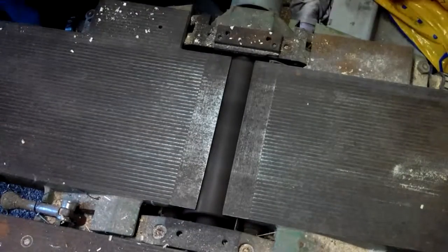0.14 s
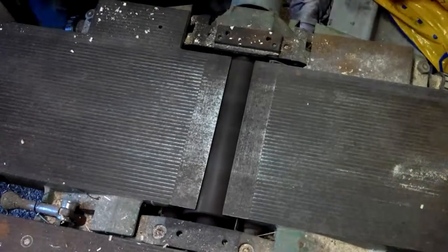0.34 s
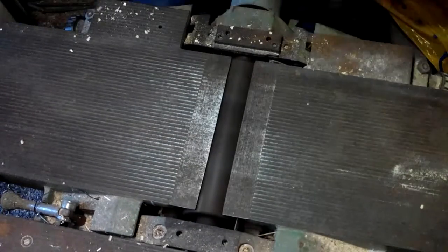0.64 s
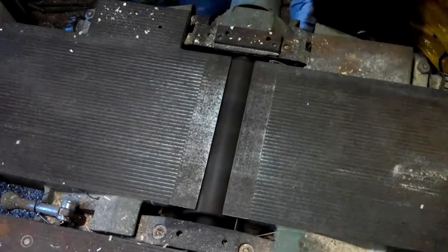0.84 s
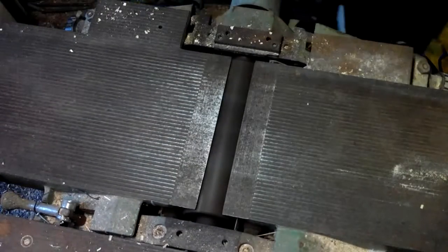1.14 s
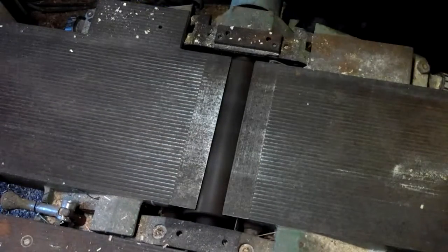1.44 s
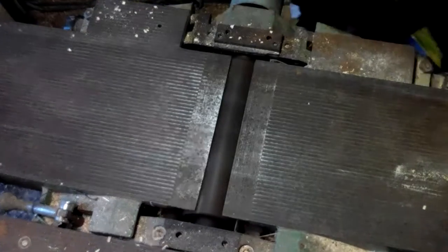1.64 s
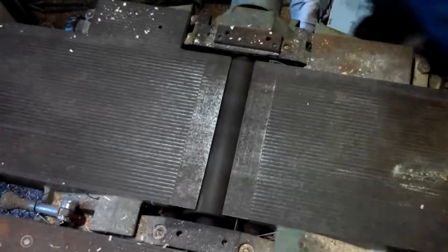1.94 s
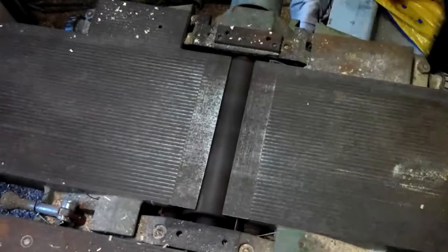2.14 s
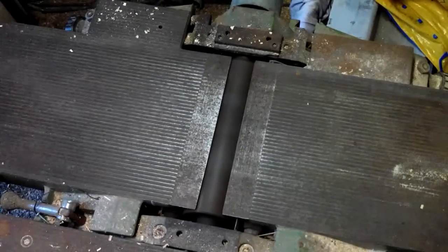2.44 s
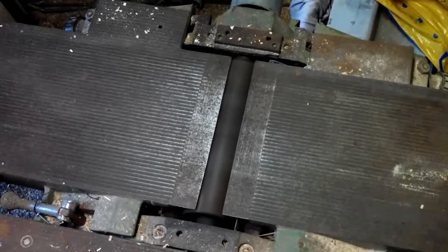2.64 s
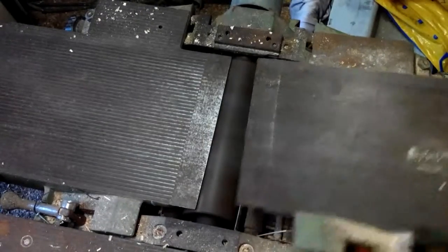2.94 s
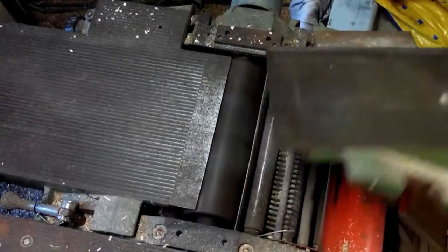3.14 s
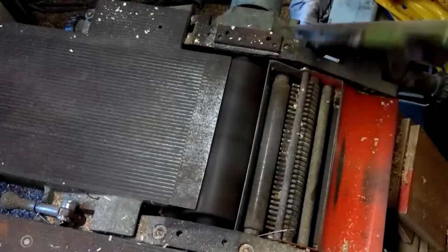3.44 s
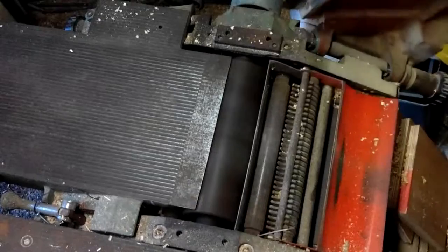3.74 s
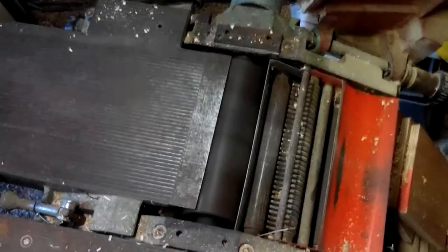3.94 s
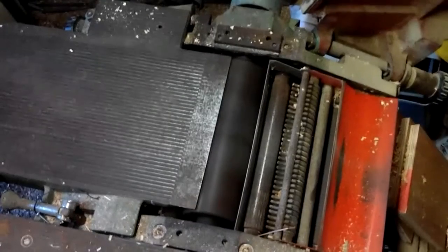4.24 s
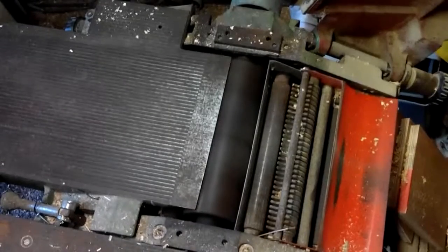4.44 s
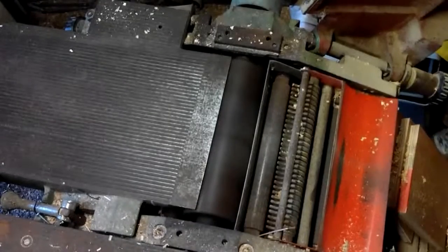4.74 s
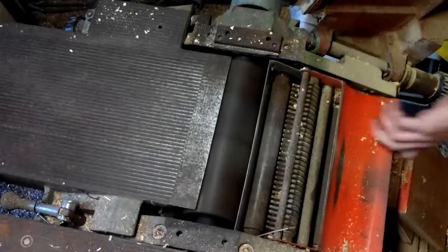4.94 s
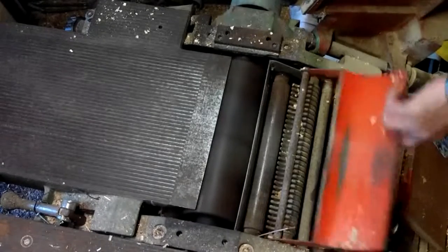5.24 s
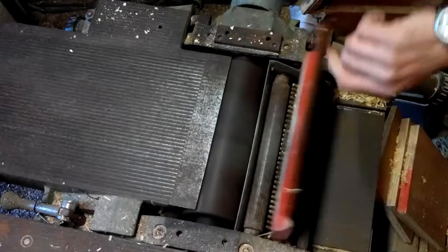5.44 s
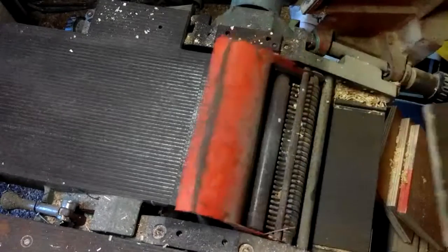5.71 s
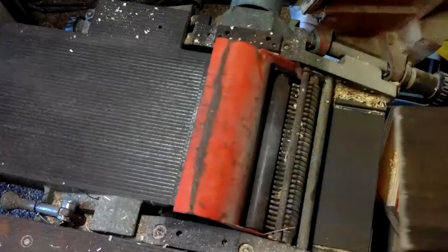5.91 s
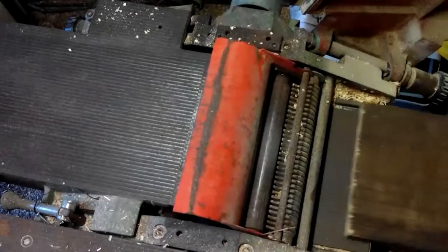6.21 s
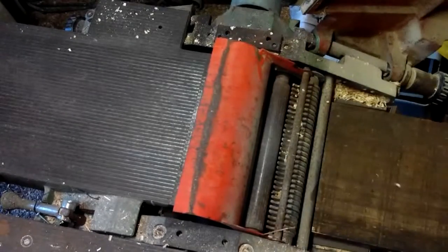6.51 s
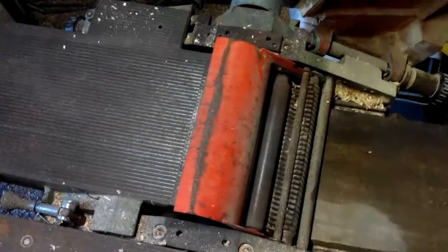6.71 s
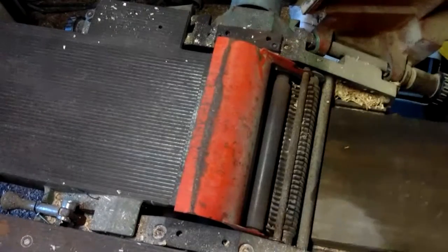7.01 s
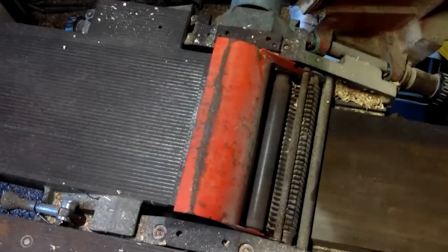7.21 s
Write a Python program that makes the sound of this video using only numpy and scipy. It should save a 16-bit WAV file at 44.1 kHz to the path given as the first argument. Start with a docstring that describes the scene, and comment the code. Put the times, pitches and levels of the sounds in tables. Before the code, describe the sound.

A woodworking planer runs steadily in a small workshop, close stereo microphones catching low siren hum, gear whine, belt throb and rushing air. The cast table comes loose with a dull clack and the tone turns brighter and more whistling. A sheet-metal hood slams with a loud rattling clang. A board bumps into place, then the knives bite with a harsh, ringing rasp to the end.

```python
"""A jointer-planer idles in a small workshop, heard by two microphones: three knives chop the air into a
siren hum, feed gears whine, a belt throbs and air rushes, all as wavering tones and shaped noise.
A table is swung open, the sheet-metal chip hood is flipped over and lands with a clang (ringing modes
in noise), and a board is pushed in until the knives bite: a rasp of one ringing blow per knife.
A limiter ducks the hum under the clang and the cut."""
import sys
import numpy as np
from scipy import signal
from scipy.fft import rfft, irfft, next_fast_len
from scipy.io import wavfile
from scipy.ndimage import uniform_filter1d, minimum_filter1d

SR = 44100
rng = np.random.default_rng(int(sys.argv[2]) if len(sys.argv) > 2 else 0)


def int16_out(signal):
    """Quantize to a 16-bit WAV file."""
    q = np.round(np.clip(np.atleast_2d(signal).T, -1, 1) * 32767)
    wavfile.write(sys.argv[1], SR, q.astype(np.int16))


N = 325006
TIME = np.arange(N) / SR  # s

HEAD_HZ, KNIVES = 83.985, 3  # cutterhead turns per second, knives on it
KNIFE_HZ = HEAD_HZ * KNIVES
FEED_HZ, BELT_HZ = 12.008, 8.455  # feed shaft turns and belt laps per second
CUT_S, BITE_S = 7.146, 0.016  # the knives meet the board; time to the first full bite


def amp(db):
    """Decibels to gain."""
    return 10 ** (np.asarray(db) / 20)


def unit(x):
    """Scales to rms 1."""
    return x / np.sqrt(np.mean(x ** 2) + 1e-20)


def ramp(start, length):
    """Rises from 0 to 1 over length seconds."""
    return np.clip((TIME - start) / length, 0, 1)


def swell(centre_s, length_s):
    """A bell-shaped rise and fall around one moment."""
    return np.exp(-((TIME - centre_s) / length_s) ** 2)


# Changes around the cutterhead, each with its start and length in seconds.
TABLE_OPENS, HOOD_CLOSES, BOARD_ENTERS = (2.93, 0.41), (5.6, 0.33), (6.703, 0.01)


def staged(levels):
    """A level through the stages: table shut, table open, hood on and, if given, board in."""
    moves = (TABLE_OPENS, HOOD_CLOSES, BOARD_ENTERS)
    return levels[0] + sum(step * ramp(*move) for step, move in zip(np.diff(levels), moves))


def curves(rows):
    """Each column of a time table at every sample."""
    s, *columns = np.transpose(rows)
    return [np.interp(TIME, s, c) for c in columns]


def at_hz(points, hz):
    """Reads a spectrum on a log-frequency axis."""
    f, value = np.transpose(points)
    return np.interp(np.log(hz + 1), np.log(f + 1), value)


def filtered(x, gain):
    """Filters a sound by a gain that is a function of frequency."""
    size = next_fast_len(x.shape[-1], True)
    hz = np.fft.rfftfreq(size, 1 / SR)
    return irfft(rfft(x, size) * gain(hz), size)[..., :x.shape[-1]]


def colour(x, points):
    """Filters a sound by a spectrum in dB."""
    return filtered(x, lambda hz: amp(at_hz(points, hz)))


def resonate(x, hz, width_hz):
    """A resonance of gain 1 at its centre."""
    return signal.lfilter(*signal.iirpeak(hz, hz / width_hz, fs=SR), x)


def wander(rate):
    """Slow chance of rms 1, with about rate turns a second."""
    coarse = TIME[::128]
    f = np.fft.rfftfreq(len(coarse), 128 / SR)
    spectrum = rfft(rng.standard_normal(len(coarse))) / np.sqrt(1 + (f / rate) ** 4)
    return np.interp(TIME, coarse, unit(irfft(spectrum, len(coarse))))


# How alike the left and right microphones hear the shop.
# Each row: frequency in Hz, likeness from -1 to 1.
LIKENESS = [(30, .45), (70, .975), (120, .987), (250, .988), (500, .97), (1000, .86), (2000, .81),
            (3200, .5), (4500, -.05), (6000, -.4), (9000, -.5)]


def likeness(hz):
    """How alike the two microphones hear a frequency; never quite the same."""
    return np.clip(at_hz(LIKENESS, hz), -1, .99)


def noise_pair(size):
    """White noise at two microphones, alike in the bass and unlike in the treble."""
    def shares(hz):
        return np.sqrt([(1 + likeness(hz)) / 2, (1 - likeness(hz)) / 2])

    mid, side = filtered(rng.standard_normal((2, size)), shares)
    return np.array([mid + side, mid - side])


def tone(turns, hz, db, flutter, flutter_hz, offset=0):
    """One wavering machine line; the higher it is, the more its phase differs between the microphones."""
    wavering = 1 + flutter * (wander(flutter_hz) + 1j * wander(flutter_hz))
    line = amp(db) * np.exp(2j * np.pi * (turns + offset)) * wavering
    lead = np.exp(.5j * np.arccos(likeness(hz)))
    return np.sqrt(2) * np.array([(line * lead).real, (line / lead).real])


# Rush of air and bearings with the table shut and open, before the stage offsets below.
# Each row: frequency in Hz, level in dB per Hz.
RUSH_SHUT = [(30, -84.5), (60, -82), (90, -73), (130, -63), (190, -60.5), (290, -64), (460, -63.5),
             (800, -73), (1300, -77), (2000, -75.5), (3200, -76.5), (5100, -80.5), (5500, -79), (5800, -83),
             (6700, -90), (7600, -102), (9000, -122)]
RUSH_OPEN = [(30, -90), (60, -81), (90, -65.5), (130, -66.5), (190, -67), (290, -62.5), (460, -63.5),
             (800, -70.5), (1150, -72.5), (1350, -75), (1650, -72.5), (3200, -75), (4600, -76), (5150, -82),
             (5500, -75), (5800, -81), (6700, -87), (7600, -101), (9000, -118)]
# Offsets in dB with table shut, table open, hood on, board in; the board steadies the rollers
# and blocks the air.
SHAKE_DB, AIR_DB = (-4, -2.4, 0.4, -8), (-1, -0.9, -0.2, -7)


def rush(clock, pulsing=0.047, patchy_db=1.18, rumble_hz=600):
    """Turbulence, pulsed as the knives pass the two table lips, over the rumble of the frame."""
    opened = ramp(*TABLE_OPENS)
    white = noise_pair(N) * np.sqrt(SR / 2)  # 0 dB per Hz
    both = (1 - opened) * colour(white, RUSH_SHUT) + opened * colour(white, RUSH_OPEN)
    rumble = filtered(both, lambda hz: 1 / (1 + (hz / rumble_hz) ** 4))
    puffs = 1 + pulsing * np.cos(2 * np.pi * 2 * KNIFE_HZ * clock)  # two lips: twice the knife rate
    air = (both - rumble) * puffs * amp(staged(AIR_DB) + patchy_db * wander(22))
    return rumble * amp(staged(SHAKE_DB)) + air


# Dull rumbles as the table is heaved and the board slides along the bed.
# Each row: moment of the crest in seconds, level in dB, length in seconds, centre in Hz.
RUMBLES = [(2.883, -37, 0.12, 185), (4.163, -52.5, 0.097, 76), (6.326, -32, 0.0087, 134),
           (6.372, -35, 0.11, 240), (6.437, -27, 0.011, 135), (6.44, -36, 0.05, 545),
           (6.715, -45, .012, 79)]


def rumbles(sharpness=3):
    """Heavy parts dragged over the frame: short swells of low noise."""
    white, out = noise_pair(N), np.zeros((2, N))
    for s, db, length, centre in RUMBLES:
        band = filtered(white, lambda hz: 1 / (1 + (sharpness * np.log((hz + 1) / centre)) ** 4))
        out += amp(db) * unit(band) * swell(s, length)
    return out


def knocks(blows, ring, spectrum, crack_t60, tail_t60, tail_db, tick_db,
           tick_t60=0.0091, focus_db=7, focus_width=.3):
    """Blows on metal: a sharp tick, a short crack, a few modes and a dense tail; each favours one range."""
    t = np.arange(SR // 3) / SR
    out = np.zeros((2, N + len(t)))
    tick = amp(tick_db - 60 * t / tick_t60)
    crack = amp(-60 * t / crack_t60)
    tail = amp(tail_db - 60 * t / tail_t60)
    attack = 1 - np.exp(-t / 0.00056)
    for s, db, ringing, centre in blows:
        def favour(hz):  # the spot struck
            nearness = np.exp(-(np.log((hz + 1) / centre) / focus_width) ** 2)
            return amp(focus_db * (nearness - 1))

        dense = unit(filtered(colour(noise_pair(len(t)), spectrum), favour)) * (tick + crack + tail)
        modes = np.zeros((2, len(t)))
        for hz, level, t60 in ring:
            # the microphones hear each mode up to a third of a turn apart
            turns = hz * t + rng.random() + rng.random((2, 1)) / 3
            modes += favour(hz) * amp(level - 60 * t / t60) * np.sin(2 * np.pi * turns)
        start = round(s * SR)
        out[:, start:start + len(t)] += amp(db) * (dense + ringing * modes) * attack
    return out[:, :N]


# The cast table unlatches. Each row: start in seconds, level in dB, share of ringing modes,
# favoured frequency in Hz.
LATCH = [(2.992, -28.5, 0.8, 3400), (3.000, -36, 1.5, 1350), (3.106, -35, .3, 3000)]
# Ring of the cast table. Each row: frequency in Hz, level in dB, fall by 60 dB in seconds.
IRON = [(1325, -2, 0.11), (2950, -5, 0.093), (3500, -3, 0.069), (4530, -14, 0.049)]
# Its dull clack. Each row: frequency in Hz, level in dB.
CLACK = [(300, -12), (1400, -3), (3400, -2), (5000, -1), (6500, -19), (9000, -54)]


def table_latch():
    """The heavy cast table comes loose: a dull clack with a few quickly damped modes."""
    return knocks(LATCH, IRON, CLACK, crack_t60=0.029, tail_t60=0.22, tail_db=-21, tick_db=3)


# The hood is gripped, lands and rattles. Each row: start in seconds, level in dB,
# share of ringing modes, favoured frequency in Hz.
HOOD_BLOWS = [(5.255, -40.5, 0.94, 4300), (5.872, -10.5, 1.2, 4600), (5.877, -17, 0.93, 1603),
              (5.885, -19, 0.31, 1750), (5.905, -22, .3, 3400), (5.924, -24, .35, 2980),
              (5.938, -27, .3, 3500), (5.949, -26, 0.27, 2300), (5.961, -27, .3, 3000),
              (5.976, -29, .3, 3340), (5.992, -18.5, 0.24, 4100), (5.999, -25, .3, 3160),
              (6.066, -29.5, 0.27, 4600), (6.075, -40, .25, 3800), (6.797, -48.5, 1.1, 4300)]
# Ring of the sheet metal. Each row: frequency in Hz, level in dB, fall by 60 dB in seconds.
SHEET = [(1610, 1, 0.12), (2040, -11.5, 0.097), (3040, -1.5, 0.09), (3210, -3, 0.086), (3650, -12, 0.22),
         (4190, -3, 0.081), (4450, 5.5, 0.053), (4680, 1, .055), (5130, -10.5, 0.29), (5370, -13.5, 0.26),
         (6030, -15, 0.16)]
# Its dense clatter. Each row: frequency in Hz, level in dB.
CLATTER = [(200, -18), (800, -7.5), (1350, 2.5), (2200, -4), (3200, -1.5), (5200, -0.5), (6700, -2.5),
           (8000, -17), (9500, -16), (11000, -31)]


def hood_clang():
    """Thin sheet metal is struck: ringing modes in a bright, dense clatter."""
    return knocks(HOOD_BLOWS, SHEET, CLATTER, crack_t60=0.058, tail_t60=0.23, tail_db=-10, tick_db=-7.0)


# Feed drive, meshes of 18 and 25 teeth with sidebands. Each row: multiple of the shaft speed
# (rounded when played), then level in dB with table shut, table open, hood on.
GEARS = [(14, -52.5, -50, -53.5), (23, -53.5, -47.5, -46), (24, -49.5, -46.5, -44), (25, -37, -35.5, -35.5),
         (27, -52, -48.5, -59.5), (32, -54.5, -50.5, -53), (35, -44, -46.5, -45), (36, -36.5, -46.5, -45),
         (43, -57, -54.5, -53.5), (50, -45.5, -52, -45.5), (54, -41.5, -42.5, -41.5),
         (71.6, -56.5, -46.5, -49.5), (74.6, -60.5, -55, -56.5), (89.9, -58, -54.5, -50),
         (96.3, -59.5, -53, -50), (107.6, -58.5, -54, -55), (161.2, -56.5, -52, -51.5),
         (180.8, -57, -56, -57)]
# Two meshes throb evenly. Each row: multiple of the shaft speed, throbs per second,
# time of a crest in seconds, depth from 0 to 1.
THROBS = [(36, 4.6, 0.051, 0.5), (54, 1.748, .29, 0.4)]
# Drive belt. Each row: multiple of its lap rate (rounded to a half when played),
# level in dB before the shaking of the frame.
BELT = [(11, -56.5), (12, -43.5), (13, -49), (14, -54), (15, -42), (16, -62), (17, -51), (33.5, -51.5),
        (37.5, -45)]
# Offset of the gear whine in dB with table shut, table open, hood on, board in.
WHINE_DB = (0.17, 0.2, -0.5, -2.5)


def drive(clock, belt_db=1):
    """Gear meshes whine and throb; the belt shakes the frame, which smears its bump over the whole lap."""
    whine_db, shake_db = staged(WHINE_DB), staged(SHAKE_DB)
    throb = {}
    for k, rate, crest, depth in THROBS:
        throb[round(k)] = abs(1 + depth * np.exp(2j * np.pi * rate * (clock - crest)))
    out = np.zeros((2, N))
    for k, *levels in GEARS:
        hz, db = round(k) * FEED_HZ, whine_db + staged(levels)
        mesh = tone(hz * clock, hz, db, flutter=.09, flutter_hz=2.1, offset=rng.random())
        out += throb.get(round(k), 1) * mesh
    for k, db in BELT:
        multiple = round(2 * k) / 2
        hz = multiple * BELT_HZ
        smear = multiple ** 2 / 14  # turns of phase
        shaken_db = db + 0.94 * shake_db + belt_db
        out += tone(hz * clock, hz, shaken_db, flutter=0.39, flutter_hz=1.2, offset=smear)
    return out


# One knife stands proud and takes most of the cut: depth of bite from 0 to 1 for each knife.
BITES = [1, 0.28, 0.29]
# Crack of each chip. Each row: frequency in Hz, level in dB.
CHIP = [(100, -20), (420, -5), (600, -15), (1100, -15), (1500, -6), (1950, -6), (2250, -7.5), (2700, -1.5),
        (3400, -2.5), (4000, -5.5), (4600, -7.5), (5300, -2), (6400, -14), (7100, -18), (8000, -31),
        (11000, -29)]
# Resonances of board and chips scream in turn as the cut deepens. Each row: time of the crest
# in seconds, length in seconds, frequency in Hz, width in Hz, level in dB against the chips.
SCREAMS = [(7.172, 0.023, 4250, 250, 3), (7.21, .05, 3440, 282, 0), (7.28, 0.051, 2680, 330, 4.5),
           (7.295, .03, 1640, 400, 3), (7.32, .05, 5100, 450, -2), (7.342, 0.027, 4260, 500, -5)]
# Drumming of the board, in step with the knives. Each row: multiple of the cutterhead speed,
# level in dB before the overall drumming level.
BOARD = [(6, -13.5), (9, -11), (12, -33), (15, -17), (18, -22), (23, -19.5)]
CUT_DB, DEEPEN_DB_PER_S, FULL_S = -28.5, 25, 0.21  # chips at the start; growth; seconds to full depth
DRUM_RISE_S, DRUM_DB = 0.062, -16  # the board is slower to start drumming
TEAR, UNEVEN = .25, .09  # share of torn-fibre noise; spread in strength from chip to chip


def cut(clock, ring_t60=0.065, room_db=-22, room_t60=0.14, tear_s=0.00084, count=5):
    """Every knife tears off a chip; one bites deepest, so the buzz repeats once a turn of the head."""
    passes = np.floor(KNIFE_HZ * clock).astype(int)
    blows = np.diff(passes, prepend=0) * np.array(BITES)[passes % KNIVES]
    blows = blows * (1 + UNEVEN * rng.standard_normal(N))
    t = np.arange(SR // 5) / SR
    decay = amp(-60 * t / ring_t60) + amp(room_db - 60 * t / room_t60)
    # as the board advances, each spot that is struck rings in its own way, evenly over all frequencies
    advance = np.interp(TIME, [CUT_S, TIME[-1]], [0, count - 1])
    ringing = np.zeros((2, N))
    for spot in range(count):
        share = np.cos(np.pi / 2 * np.minimum(abs(advance - spot), 1))
        response = rfft(noise_pair(len(t)) * decay)
        flat_ring = irfft(response / abs(response))[:, :len(t) // 2]
        ringing += signal.oaconvolve((blows * share)[None], flat_ring, axes=1)[:, :N]
    tearing = noise_pair(N) * signal.lfilter([1], [1, -np.exp(-1 / (tear_s * SR))], blows)
    chips = unit(colour(unit(ringing) + TEAR * unit(tearing), CHIP))

    screams = np.zeros((2, N))
    for s, length, hz, width, db in SCREAMS:
        screams += amp(db) * swell(s, length) * resonate(chips, hz, width)

    board = np.zeros((2, N))
    for k, db in BOARD:  # each bite pushes, then pulls
        hz = k * HEAD_HZ
        board -= tone(hz * clock, hz, db, flutter=0.1, flutter_hz=14, offset=1 / 4)

    depth_db = CUT_DB + DEEPEN_DB_PER_S * np.minimum(TIME - CUT_S, FULL_S)
    depth = ramp(CUT_S, BITE_S) * amp(depth_db)
    return depth * (chips + screams) + amp(DRUM_DB) * ramp(CUT_S, DRUM_RISE_S) * board


# Strongest harmonics of the siren. Each row: multiple of the knife rate, level in dB with
# table shut, table open, hood on, board in, then slow sway in dB.
HUM = [(1, -20.5, -26.5, -26, -23.5, 0.7), (2, -28.5, -25.7, -25.5, -26.5, 0.2),
       (3, -36, -34, -33, -33.5, 0.64)]
# Weaker harmonics. Each row: multiple of the knife rate, level in dB with table shut,
# table open, hood on, board in.
OVERTONES = [(4, -55.5, -50.5, -43.5, -48.5), (5, -57, -54, -45, -45), (7, -56, -42, -46, -45),
             (8, -44, -44.5, -51.5, -46), (9, -53, -43, -50, -58), (10, -58, -51, -58.5, -47.5),
             (11, -53, -50, -56.5, -60), (12, -56, -50.5, -51, -58), (13, -48, -45, -46.5, -45.5),
             (14, -58.5, -53.5, -63, -60), (15, -58, -61, -64.5, -82), (16, -58.5, -55, -58, -63),
             (20, -67, -61.5, -63, -61), (24, -64.5, -59, -61, -67.5)]
# With the table shut the hum drifts toward its second harmonic.
# Each row: multiple of the knife rate, drift in dB per second.
DRIFT = [(1, -0.65), (2, 1)]
# The sixth harmonic whistles, swelling while the cutterhead lies open. # Each row: time in seconds, level in dB
# before the siren sinks under the cut.
WHISTLE = [(0.1, -49.5), (0.37, -44), (0.6, -45), (0.8, -51), (0.95, -44.5), (1.3, -43.5), (1.47, -52.5),
           (1.65, -47.5), (2.2, -46.5), (2.35, -45.5), (2.7, -43.5), (2.86, -45), (3.25, -36), (3.62, -34),
           (4.0, -37.5), (4.5, -34.5), (4.85, -38), (5.27, -34.5), (5.48, -44), (5.7, -36.5), (5.8, -44),
           (6.1, -41), (6.65, -44.5), (6.84, -38.5), (7.05, -44.5), (7.13, -36), (7.2, -43)]
WHISTLE_ORDER, WHISTLE_FLUTTER = 6, .07
SIREN_SINK_DB = -5.5  # the siren sinks once the knives bite


def knife_hum(clock, sway_hz=1.3, overtone_sway_db=1.35):
    """Each knife passing the table lip sucks a pulse of air: a siren, its upper harmonics fluttering."""
    shut = 1 - ramp(*TABLE_OPENS)
    drift = {k: db_per_s * (TIME - TABLE_OPENS[0] / 2) * shut for k, db_per_s in DRIFT}
    whistle_hz = WHISTLE_ORDER * KNIFE_HZ
    (whistle_db,) = curves(WHISTLE)
    out = tone(whistle_hz * clock, whistle_hz, whistle_db, flutter=WHISTLE_FLUTTER, flutter_hz=17)
    for k, *levels, sway_db in HUM:
        hz = k * KNIFE_HZ
        db = staged(levels) + drift.get(k, 0) + sway_db * wander(sway_hz)
        out -= tone(hz * clock, hz, db, flutter=0.021 * k, flutter_hz=7.2)
    for k, *levels in OVERTONES:
        hz = k * KNIFE_HZ
        db = staged(levels) + overtone_sway_db * wander(sway_hz)
        out += tone(hz * clock, hz, db, flutter=0.09, flutter_hz=15.0, offset=rng.random())
    return out * amp(SIREN_SINK_DB * ramp(CUT_S, BITE_S))


# The level dips briefly, twice. Each row: time of the lowest point in seconds, depth in dB,
# length in seconds.
DIPS = [(6.711, -7.5, 0.012), (7.187, -5.5, 0.024)]


def dips():
    """Gain that sinks for a moment and comes back."""
    return amp(sum(db * swell(s, length) for s, db, length in DIPS))


# Balance of the two microphones. Each row: frequency in Hz, left minus right in dB.
BALANCE_DB = [(60, 2.5), (250, -1), (500, 0.7), (1000, 3), (2000, 2.5), (4000, 1.5), (6000, 1), (9000, 2)]


def scene():
    """All running parts share one clock whose speed drifts very slightly."""
    clock = TIME + np.cumsum(.0003 * wander(1.94)) / SR
    running = rush(clock) + drive(clock) + cut(clock) + knife_hum(clock)
    handled = rumbles() + table_latch() + hood_clang()
    halves = np.array([[.5], [-.5]])  # left, right
    heard = filtered(running + handled, lambda hz: amp(halves * at_hz(BALANCE_DB, hz)))
    return heard * dips()


CEILING_DB, EDGE_HZ = -10.8, 11250  # limiter threshold; upper edge of the band


def record(dry, recovery_db_per_s=150, treble_db=2):
    """A look-ahead limiter, keener on the treble, ducks before each peak and recovers; then a band limit."""
    sensed = colour(dry, [(1000, 0), (3000, treble_db)])
    over_db = np.maximum(20 * np.log10(abs(sensed).max(0) + 1e-9) - CEILING_DB, 0)
    ahead_db = -minimum_filter1d(-over_db, size=801, origin=-400)  # highest of the coming samples
    fall = TIME * recovery_db_per_s
    held_db = np.maximum.accumulate(ahead_db + fall) - fall
    duck_db = uniform_filter1d(held_db, size=701, origin=350)  # smoothed over the past samples
    fade_in = np.minimum(TIME / .008, 1)
    limited = dry * fade_in / amp(duck_db)
    low_pass = signal.firwin(511, EDGE_HZ, window=("kaiser", 9), fs=SR)
    return signal.oaconvolve(limited, low_pass[None], "same")


dry = scene()
out = record(dry)
int16_out(out)
```